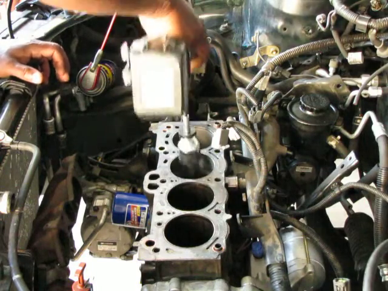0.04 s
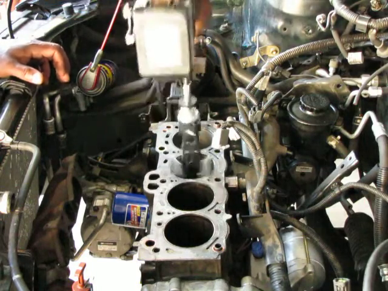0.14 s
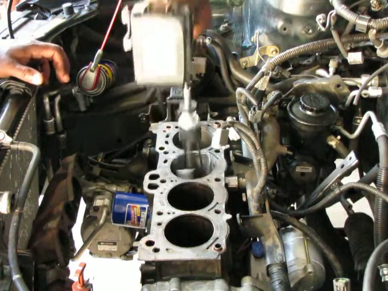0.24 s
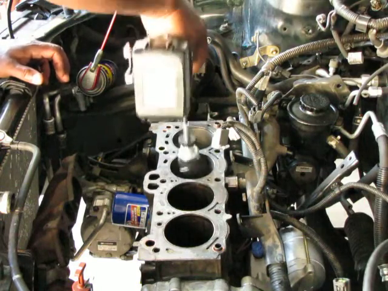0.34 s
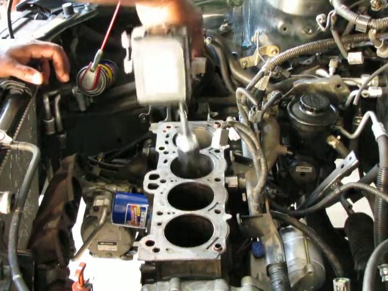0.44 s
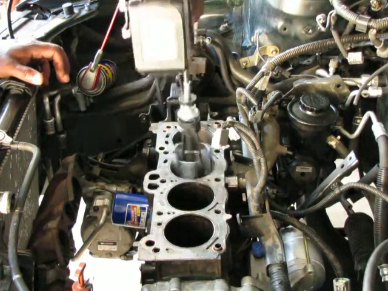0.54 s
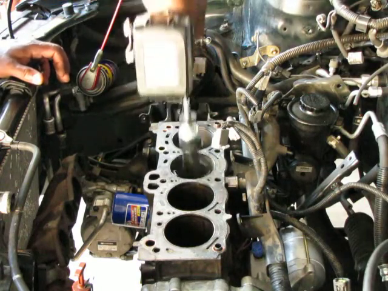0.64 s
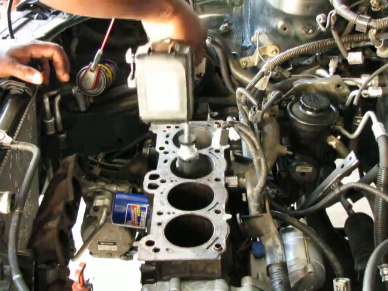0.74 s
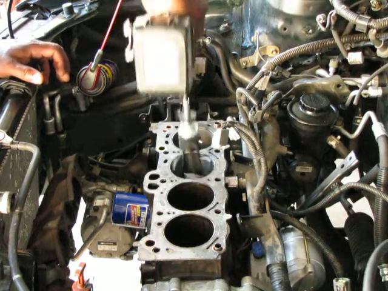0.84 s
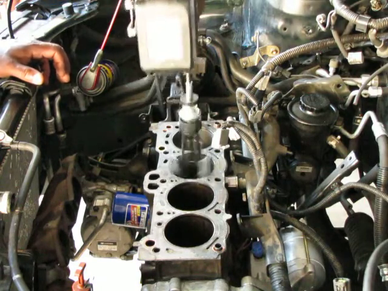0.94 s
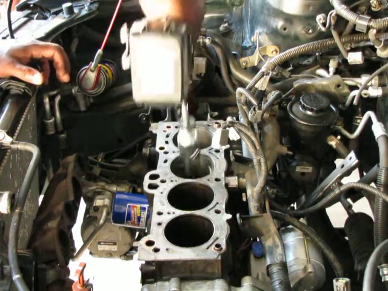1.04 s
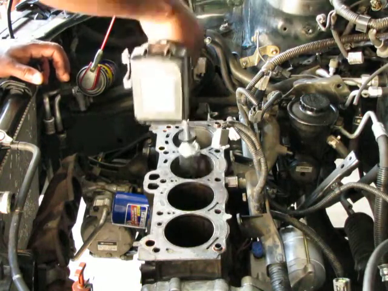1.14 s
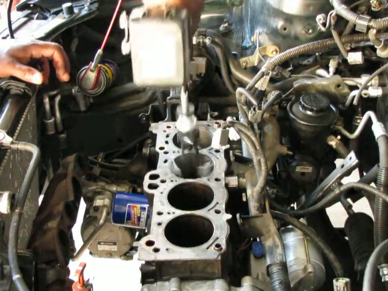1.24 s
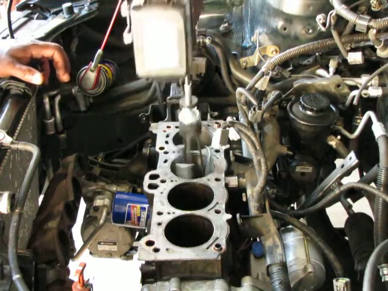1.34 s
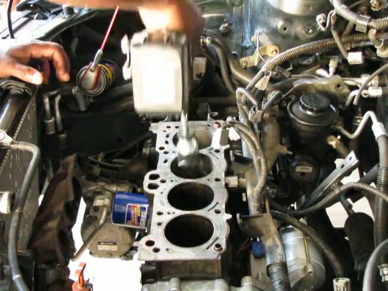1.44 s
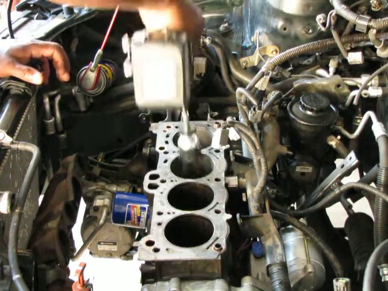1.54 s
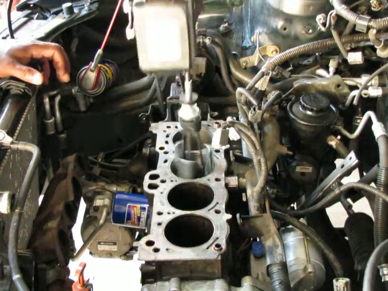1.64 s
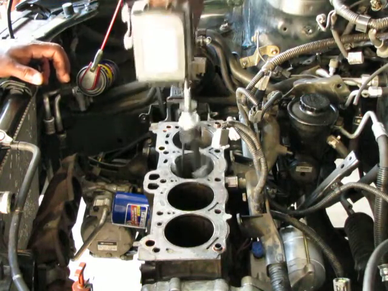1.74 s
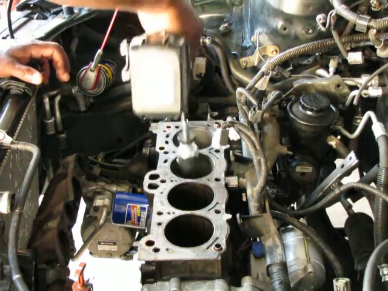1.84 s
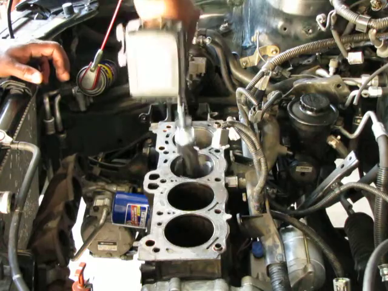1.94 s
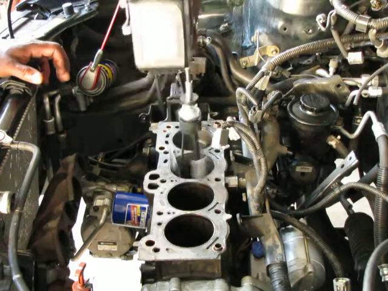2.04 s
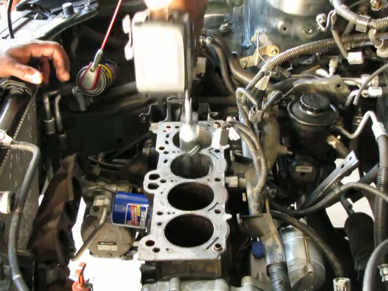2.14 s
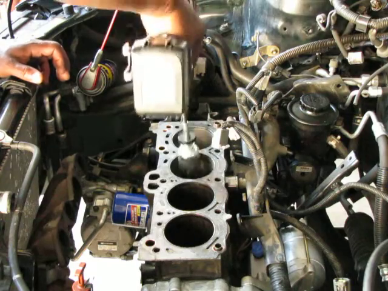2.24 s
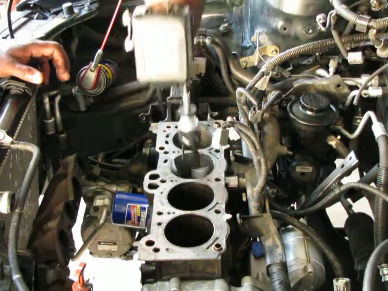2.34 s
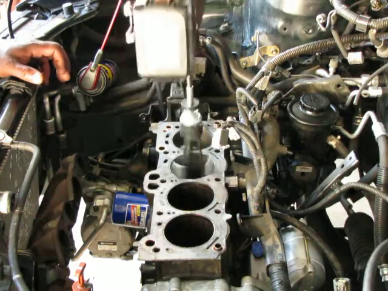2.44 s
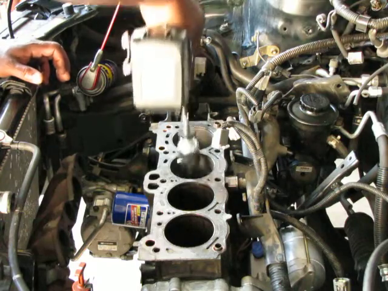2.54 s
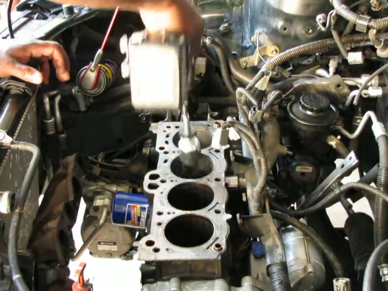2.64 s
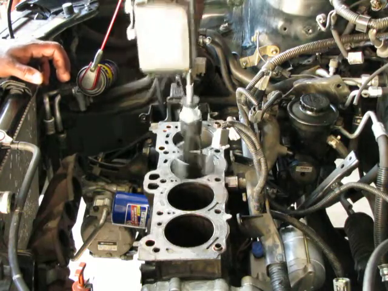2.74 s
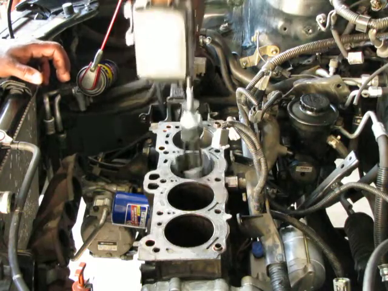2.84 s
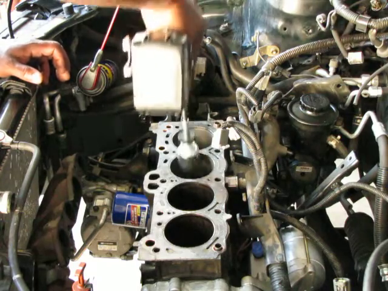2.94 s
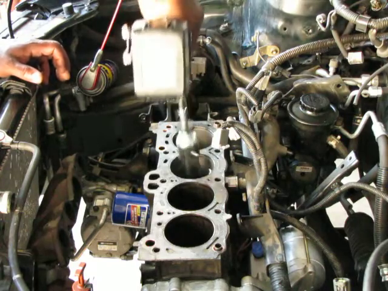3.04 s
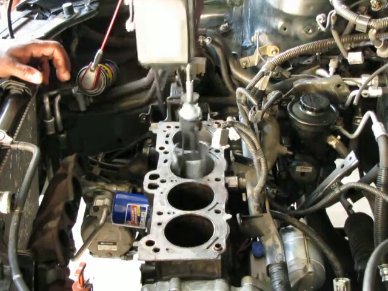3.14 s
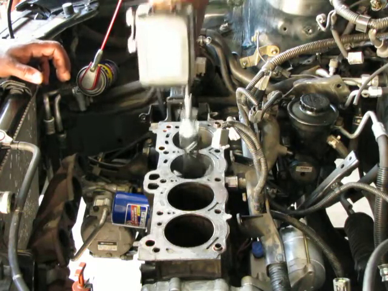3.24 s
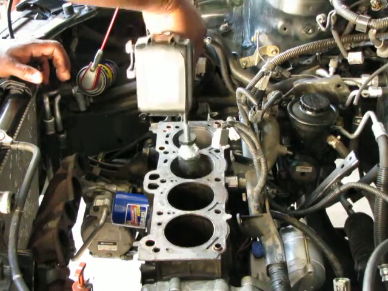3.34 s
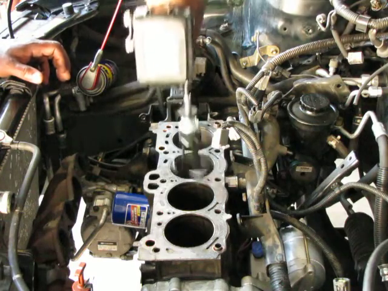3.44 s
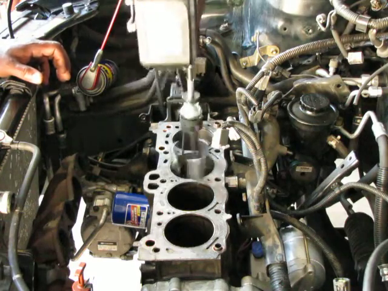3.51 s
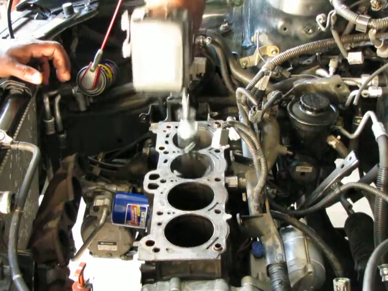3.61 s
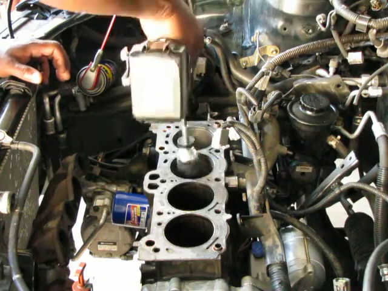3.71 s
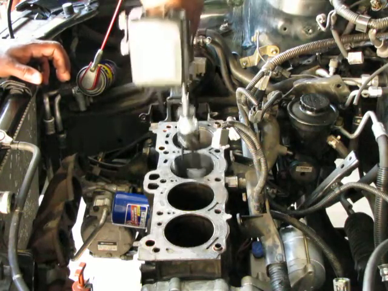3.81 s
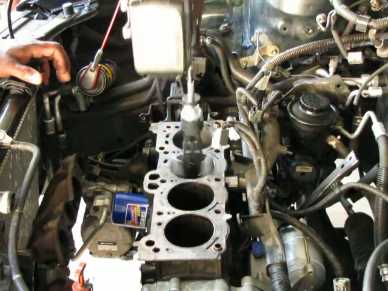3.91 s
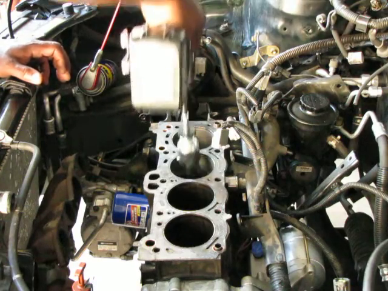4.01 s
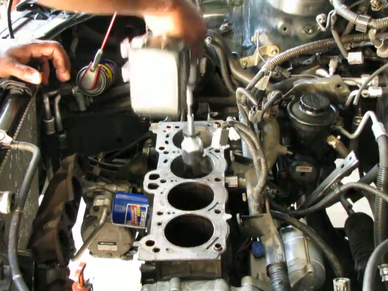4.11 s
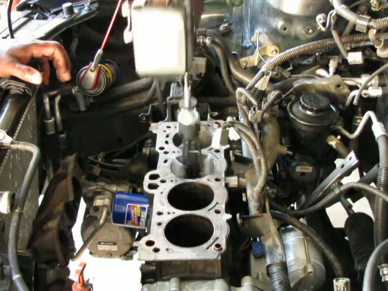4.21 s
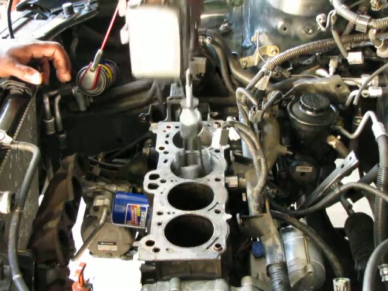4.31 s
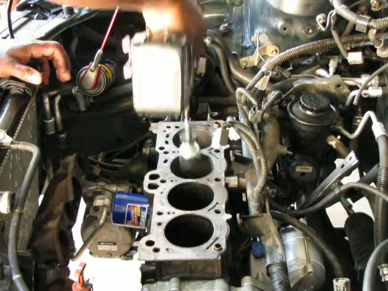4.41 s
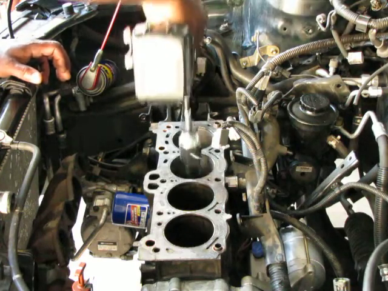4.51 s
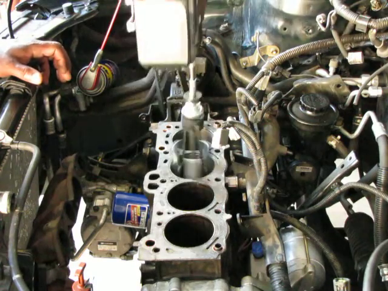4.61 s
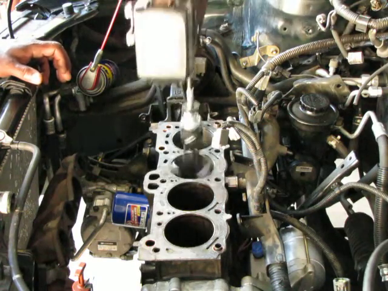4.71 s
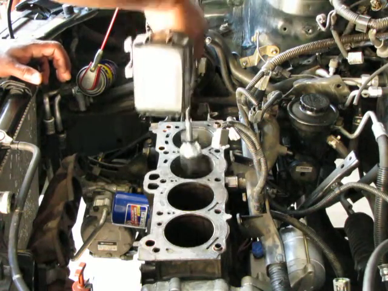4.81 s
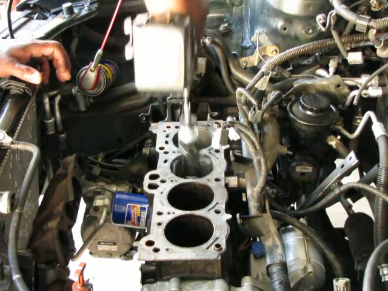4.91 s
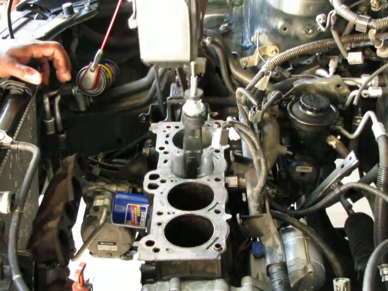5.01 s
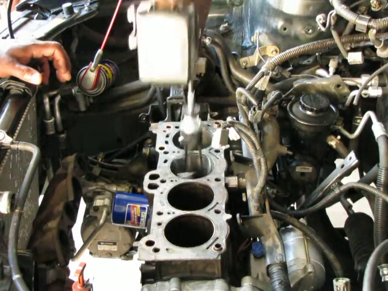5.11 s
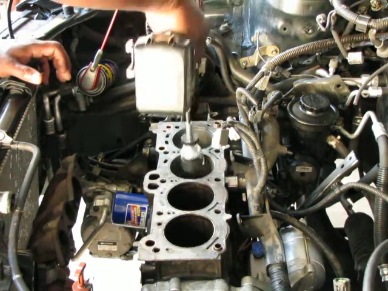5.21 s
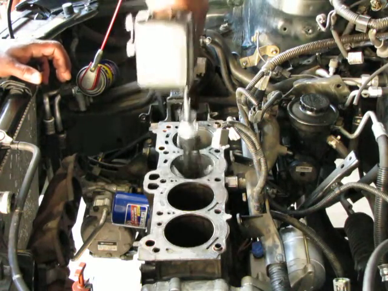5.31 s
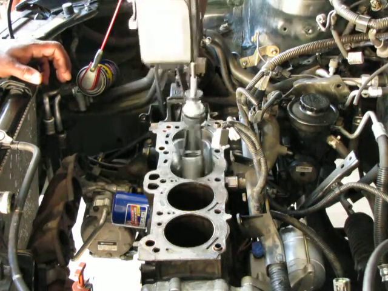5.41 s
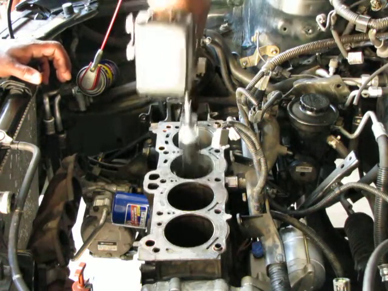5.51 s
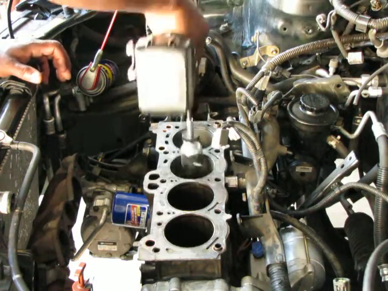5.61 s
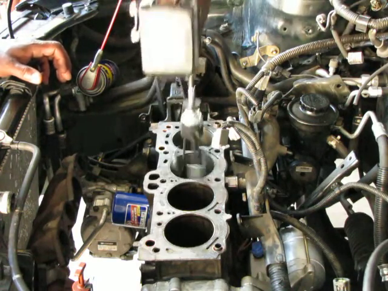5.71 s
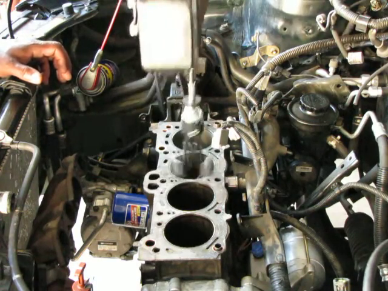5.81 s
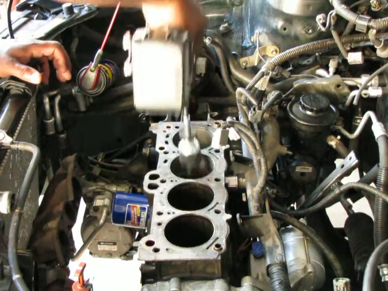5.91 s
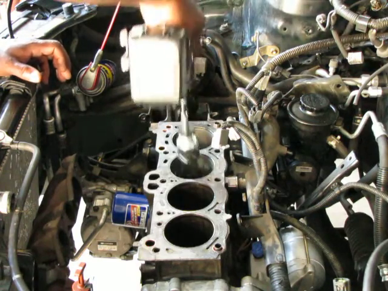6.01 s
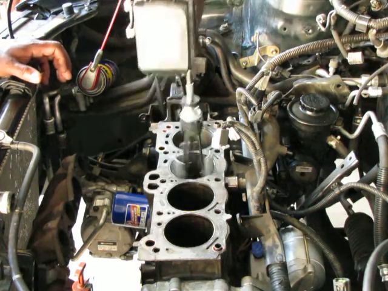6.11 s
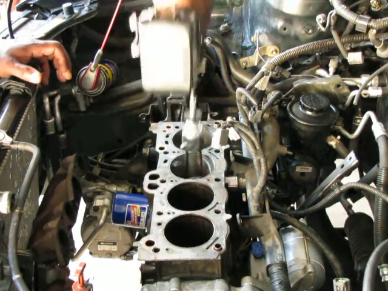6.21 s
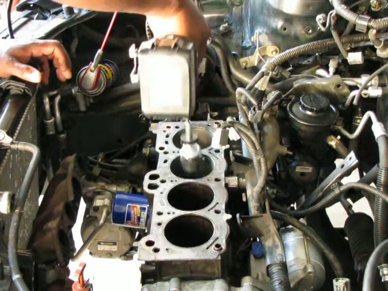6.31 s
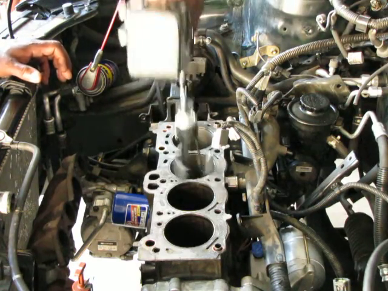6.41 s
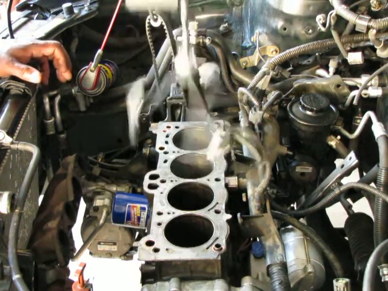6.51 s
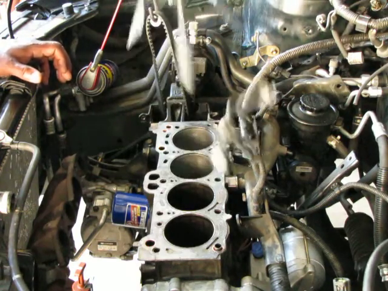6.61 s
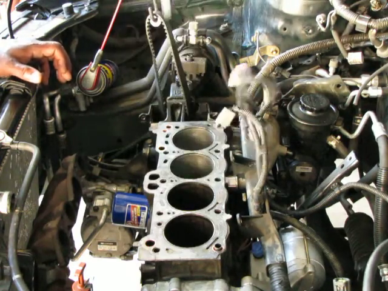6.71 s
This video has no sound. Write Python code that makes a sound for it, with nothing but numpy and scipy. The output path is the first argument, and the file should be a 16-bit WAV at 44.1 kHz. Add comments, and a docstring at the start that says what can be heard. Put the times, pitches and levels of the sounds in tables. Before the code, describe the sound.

Close, harsh drill whine and gritty abrasive scraping pulse nearly three times a second in an engine bore, clacking metallically, then rattling out and stopping.

```python
"""In a garage, an electric drill spins a honing tool in a cylinder of an engine block, pumped nearly three
strokes a second. The motor whines in shaft-locked tones; abrasive stones rasp as grit excites the bore.
The stones bite and thud at the foot of each stroke, and hard clacks ring the steel tool and the block.
The recorder's gain control ducks at every hard clack and swells back. At last the tool rattles out of
the bore and the drill falls quiet."""
import sys
import numpy as np
from scipy import signal
from scipy.fft import rfft, irfft, next_fast_len
from scipy.io import wavfile
from scipy.ndimage import uniform_filter1d

SR = 44100
rng = np.random.default_rng(int(sys.argv[2]) if len(sys.argv) > 2 else 0)


def master_out(mix):
    """Clip the mix to full scale and print it as 16-bit PCM to the path in sys.argv[1]."""
    frames = np.transpose(np.atleast_2d(mix))
    ceiling = np.clip(frames, -1, 1)
    pcm = np.round(ceiling * 32767).astype(np.int16)
    wavfile.write(sys.argv[1], SR, pcm)


N = 297675


def from_db(db):
    """Logarithmic level: decibels to amplitude gain."""
    return 10 ** (np.asarray(db) / 20)


def rms_one(x):
    """Power normalization: scale to a root mean square of one."""
    return x / np.sqrt(np.mean(x ** 2) + 1e-20)


def in_time(rows):
    """Linear interpolation: each column of a curve, sample by sample."""
    seconds, *columns = np.transpose(rows)
    time_s = np.arange(N) / SR
    return [np.interp(time_s, seconds, column) for column in columns]


def at_hz(points, hz):
    """Logarithmic frequency: interpolate a table evenly per octave."""
    table_hz, value = np.transpose(points)
    return np.interp(np.log(np.maximum(hz, 1)), np.log(table_hz), value)


def drift(corner_hz):
    """Low-passed noise: a smooth random wander of spread 1."""
    step = 40   # samples between the points of the slow noise
    r = np.exp(-2 * np.pi * corner_hz * step / SR)
    noise = rng.standard_normal(N // step + 2002)
    slow = signal.lfilter([1], [1, -2 * r, r * r], noise)[2000:]   # the filter has settled
    return np.interp(np.arange(N) / step, np.arange(len(slow)), rms_one(slow))


def fall(start_s, db_per_s):
    """Exponential decay: a level in dB that holds at 0, then sinks steadily."""
    return -db_per_s * np.maximum(np.arange(N) / SR - start_s, 0)


def swell(middle_s, half_s):
    """Gaussian envelope: a smooth bump of height 1, down to 1/e at half_s from its middle."""
    distance = (np.arange(N) / SR - middle_s) / half_s
    return np.exp(-np.minimum(distance ** 2, 50))


# correlation of the two ears: frequency_hz, likeness (0 unrelated, 1 identical)
EAR_LIKENESS = [(30, 0.48), (130, 0.9), (300, 0.99), (640, 1), (1400, 0.9), (3000, 0.81), (6000, 0.55),
                (14000, 0.1)]


def coloured(force, spectrum, resonances=()):
    """Spectral shaping and interaural coherence: filter two unrelated forces into stereo of rms 1."""
    size = next_fast_len(N)
    hz = np.arange(size // 2 + 1) * SR / size
    db = at_hz(spectrum, hz)
    for mode_hz, width_hz, lift_db in resonances:
        db = db + lift_db / (1 + (2 * (hz - mode_hz) / width_hz) ** 2)
    mid, side = rfft(force, size) * from_db(db)
    alike = np.clip(at_hz(EAR_LIKENESS, hz), -1, 1)
    ears = np.sqrt(1 + alike) * mid + np.sqrt(1 - alike) * side * [[1], [-1]]
    return rms_one(irfft(ears, size)[:, :N])


def ring(force, modes):
    """Modal resonance: parallel resonators of alternating sign; white noise keeps its power."""
    out, power = 0, 0
    for k, (hz, width_hz, db) in enumerate(modes):
        r = np.exp(-np.pi * width_hz / SR)
        top = (1 - r * r) / 2
        poles = [1, -2 * r * np.cos(2 * np.pi * hz / SR), r * r]
        response = signal.lfilter([top, 0, -top], poles, force + 1e-18)
        out = out + (-1) ** k * from_db(db) * response
        power += top * from_db(db) ** 2
    return out / np.sqrt(power)


def partials(angle, orders, main, main_share, scatter, apart):
    """Multipath interference: reflections off the moving drill add to or cancel each shaft-locked tone."""
    def wander():
        return drift(10.5) + 1j * drift(19)

    out = np.zeros((2, N))
    for multiple, db in orders:
        directional = min(multiple / main, 1)   # long waves reach both ears alike
        reflected = main_share if multiple == main else 1   # the main tone comes more directly
        common = 1 + reflected * scatter * wander()
        path = common + apart * directional * wander() * np.array([[1], [-1]])
        if multiple == main:   # share the common strength between the ears
            both = np.sqrt(np.mean(np.abs(path) ** 2, axis=0))
            path = path / both * np.abs(path.mean(axis=0))
        tone = path * np.exp(1j * (multiple * angle + rng.uniform(0, 2 * np.pi)))
        out += from_db(db) * rms_one(tone.real)
    return out


# shaft speed of the motor: time_s, rotation_hz
MOTOR_SPEED = [(0.03, 309.0), (0.06, 316.1), (0.16, 321.8), (0.32, 314.3), (0.52, 328.0), (0.66, 315.1),
               (0.76, 317.0), (0.85, 324.2), (1.48, 321.1), (1.52, 318.7), (1.66, 322.1), (1.74, 317.9),
               (1.86, 319.3), (1.99, 332.7), (2.23, 320.5), (2.34, 327.0), (2.61, 318.2), (2.73, 324.0),
               (2.94, 319.7), (3.13, 324.9), (3.28, 314.7), (3.43, 322.1), (3.75, 320.3), (3.81, 326.4),
               (3.86, 326.2), (4.1, 317.0), (4.33, 323.0), (4.5, 316.3), (4.53, 322.7), (4.66, 325.2),
               (4.77, 309.4), (4.91, 324.1), (5.01, 326.9), (5.04, 326.2), (5.15, 308.5), (5.26, 321.0),
               (5.31, 324.4), (5.42, 322.7), (5.51, 309.1), (5.59, 314.8), (5.79, 319.5), (5.9, 314.5),
               (6.08, 323.8), (6.15, 321.7), (6.22, 309.9), (6.26, 309.8), (6.48, 323.9), (6.55, 318.0)]
# hum of motor and gears: multiple of the shaft speed, level_db (relative to the tenth order)
HUM_TONES = [(.437, -30), (1, -23.5), (2, -25), (2.2, -25), (4, -22.5), (6, -15.5), (8, -22), (8.4, -10.5),
             (10, 0), (10.4, -11.5), (11, -11.5), (12, -19.5), (14, -9.5)]
# shrill cluster with sidebands one revolution apart: multiple of the shaft speed, relative level_db
SHRILL_TONES = [(19, -11), (20, 0.5), (21, -5.5), (22, -8.5), (23, -28), (29, -30), (30, -6.5), (31, -18),
                (40, -15)]
# slow swell of the two whines: time_s, hum_change_db, shrill_change_db
WHINE_SWELL = [(.08, -2, -1), (.27, 1, -1.5), (.55, -3, -4), (1.2, 0, 1), (1.85, -2.5, -2.5),
               (2.15, 0.5, -2), (2.5, 0, .5), (3.2, -1.5, -2.5), (3.6, -1, -2), (3.95, 1.5, 1),
               (4.15, -0.5, 0.5), (4.6, 2.5, 2.5), (5.02, 4, 2.5), (5.35, 2, 3.5), (5.7, 1, -0.5),
               (5.93, 2, 3), (6.27, 0.5, 3), (6.45, -2.5, -1.5)]
# foot of each stroke: start_s (middle of the bump), bite_db (extra rasp of the stones), thud_db (relative)
STROKE_FEET = [(.005, 4, -48), (.395, 7, -43.5), (.755, 4, -50), (1.135, 5, -48), (1.5, 4.5, -47),
               (1.885, 1, -45), (2.24, 0, -42), (2.6, 4.5, -45), (3.0, 2.5, -40), (3.372, 1, -43),
               (3.73, 5, -45), (4.065, 4.5, -41), (4.46, 5.5, -37), (4.85, 0.5, -49), (5.13, 0, -60),
               (5.585, 2.5, -53), (5.96, 3.5, -48), (6.305, 5.5, -35.5)]
USUAL_SPEED_HZ = 321
WHINE_DIP_DB, WHINE_DIP_S = 1, 0.071   # the whine falters at each foot: depth, half-length
FLUTTER_DB_PER_SAG_HZ = 0.34   # when the motor labours, the shrill whine breaks up
TRIGGER_OFF_S, WHINE_FALL_DB_PER_S = 6.53, 200


def drill(jitter_rad=0.014, flutter_db=1.34, waver_db=1.0, hum_db=-29.0, shrill_db=-24.5):
    """Harmonic orders: uneven rotation roughens high multiples most; they fade as the trigger is let go."""
    speed, = in_time(MOTOR_SPEED)
    hum_change, shrill_change = in_time(WHINE_SWELL)
    angle = 2 * np.pi * np.cumsum(speed) / SR + jitter_rad * drift(45)
    dip_db = WHINE_DIP_DB * sum(swell(s, WHINE_DIP_S) for s, _, _ in STROKE_FEET)
    sag_hz = np.maximum(USUAL_SPEED_HZ - speed, 0)
    labour_db = FLUTTER_DB_PER_SAG_HZ * sag_hz * (np.minimum(drift(40), 1.5) - .5)

    hum_level = hum_db + hum_change - dip_db + waver_db * drift(15)
    hum = from_db(hum_level) * partials(
        angle, HUM_TONES, main=10, main_share=0.49, scatter=0.4, apart=0.36)
    shrill_level = shrill_db + shrill_change - dip_db + labour_db
    shrill = from_db(shrill_level) * partials(
        angle, SHRILL_TONES, main=20, main_share=.75, scatter=0.29, apart=0.83)

    hum_balance = from_db(np.array([[-.5], [.5]]))   # slightly stronger on the right
    fade_db = fall(TRIGGER_OFF_S, WHINE_FALL_DB_PER_S) + flutter_db * drift(32)
    return (hum * hum_balance + shrill) * from_db(fade_db)


def grit(per_s, size_db, hiss):
    """Impulsive excitation: grains of uneven size break loose over a smooth friction hiss."""
    sizes = from_db(size_db * np.minimum(rng.exponential(1, N), 2.5))
    breaks = rng.random(N) < per_s / SR
    grains = breaks * sizes * rng.choice([-1, 1], (2, N))
    return rms_one(grains) + hiss * rng.standard_normal((2, N))


# resonances of the stones and their sprung arms: pitch_hz, width_hz, relative level_db
SQUEAK_MODES = [(2640, 40, -19), (3700, 83, -10), (4340, 26, -14), (5250, 57, -14.5), (5550, 48, -13.5),
                (8300, 160, -17), (13200, 120, -31)]


def squeaks(patchy_db=7.5):
    """Stick-slip resonance: the stones catch now and then and sing briefly at a mode."""
    out = 0
    for mode in SQUEAK_MODES:
        noise = rng.standard_normal((2, N))
        catching = from_db(patchy_db * np.minimum(drift(30), 2))
        out = out + from_db(mode[2]) * rms_one(ring(noise * catching, [mode]))
    return out


# spectrum of the rasp: frequency_hz, relative density_db (per Hz)
RASP_COLOUR = [(900, -24.5), (1700, -13.5), (2700, -1), (3700, -1.5), (5000, 1.5), (7000, -2), (9000, -2.5),
               (10800, -8.5), (12600, -8), (14000, -12), (15800, -18.5)]
# spectrum of the low grinding: frequency_hz, relative density_db (per Hz)
GRIND_COLOUR = [(120, -13), (230, -15.5), (400, -20), (520, -16), (800, -4), (1300, -1), (2000, 1),
                (2800, 1), (4500, -32), (8000, -37)]
# resonances of block and bore: pitch_hz, width_hz, lift_db
BORE_MODES = [(528, 62, 8.5), (818, 27, 5), (1172, 48, 4.5), (1325, 23, 4), (1436, 81, 4), (1694, 20, 7),
              (2445, 61, 0.5), (2740, 27, -6), (3260, 58, 4), (4320, 150, 1.5)]
# how hard the hand bears on the tool: time_s, level_change_db
HAND_PRESSURE = [(0, 0), (.6, -1.5), (1.3, -1), (1.9, -1.5), (2.6, 0), (3.3, -1), (4.0, 0), (4.6, 2.5),
                 (5.1, 3), (5.6, 1.5), (6.1, 3), (6.5, 2.5)]
RASP_DB_PER_SAG_HZ = 0.0849   # the friction that slows the motor also makes the stones louder
BITE_S, GRIND_BITE_SHARE = 0.023, 0.66   # half-length; how much of the bite the grinding follows
# the tool is drawn out: the stones spring open and scuff over the rim, then run free
EXIT_S, EXIT_HALF_S, EXIT_RASP_DB, EXIT_GRIND_DB = 6.55, 0.029, 4.5, 9.5
CLEAR_S, RASP_FALL_DB_PER_S, GRIND_FALL_DB_PER_S = 6.57, 188, 35


def stones(rasp_db=-22.0, grind_db=-36.5, judder_db=0.72):
    """Friction-excited resonance: grit drives the bore, harder under load, at stroke feet and on the rim."""
    speed, = in_time(MOTOR_SPEED)
    pressure, = in_time(HAND_PRESSURE)
    load = pressure + RASP_DB_PER_SAG_HZ * (USUAL_SPEED_HZ - speed)
    bite = sum(db * swell(s, BITE_S) for s, db, _ in STROKE_FEET)
    rim = swell(EXIT_S, EXIT_HALF_S)
    judder = from_db(judder_db * drift(30))

    rasp_level = rasp_db + load + bite + EXIT_RASP_DB * rim
    rasp_level = rasp_level + fall(CLEAR_S, RASP_FALL_DB_PER_S)
    scrape = coloured(grit(per_s=7000, size_db=1.0, hiss=0.91), RASP_COLOUR, BORE_MODES)
    rasp = from_db(rasp_level) * (scrape + from_db(-4.0) * squeaks())

    grind_level = grind_db + load + GRIND_BITE_SHARE * bite + EXIT_GRIND_DB * rim
    grind_level = grind_level + fall(CLEAR_S, GRIND_FALL_DB_PER_S)
    rumble = coloured(grit(per_s=3000, size_db=2.5, hiss=1.44), GRIND_COLOUR, BORE_MODES)
    grind = from_db(grind_level) * rumble

    grind_balance = from_db(np.array([[-1.3], [1.3]]))   # stronger on the right
    return judder * (rasp + grind * grind_balance)


# tool striking the bore: start_s, relative level_db, relative knock_db (dull part), chatter_s (length)
TOOL_BLOWS = [(.002, -19, -15, 0.026), (.022, -5.5, -15, 0.008), (.37, -2, -10.5, 0.0025),
              (.392, -21, 0, 0.015), (.414, -2.5, -27, 0.0077), (.444, 10.5, -21, 0.0025),
              (0.46, -1.5, -27, 0.0027), (0.76, -11, -7, .0036), (0.786, 4, -20, 0.0033),
              (0.793, -10, -11, .0025), (1.145, -13, -1, .002), (1.885, -7.5, -9, 0.006),
              (2.249, -3.5, -16, 0.0073), (2.612, -2, -14, 0.0054), (4.078, -3.5, -14, 0.0035),
              (4.444, -9, -6, 0.0078), (4.483, 6, -16.5, 0.0093), (4.85, -8.5, -13, .0068),
              (5.604, 1.5, -16, 0.0033), (5.97, 1.5, -19, 0.0053), (6.332, 9, -19, .005),
              (6.479, 1.5, -8, 0.0068), (6.502, -1, 1.5, 0.0016), (6.508, -10, 2, 0.0021),
              (6.512, 0, -10.5, 0.0014), (6.536, -7, 0, 0.0031), (6.606, -20, 16, 0.0026),
              (6.696, -21, -7, 0.0024), (6.738, -14.5, -8.5, 0.0024)]
# ring of the steel tool: pitch_hz, width_hz, relative level_db
STEEL_MODES = [(3560, 140, -5), (3770, 44, 3.5), (4810, 570, 5), (5430, 69, 11.5), (6320, 160, 10),
               (7260, 130, 8), (8450, 690, 3), (9400, 330, 5), (9900, 1800, -4), (13500, 150, 0),
               (13200, 840, -16)]
# dull knock of the block: pitch_hz, width_hz, relative level_db
KNOCK_MODES = [(595, 280, -8), (1115, 120, -3.5), (1387, 79, 4), (1710, 300, 0), (2560, 135, 6.5),
               (2990, 57, 9), (4200, 1100, -1)]


def clacks(steel_db=-3.5, knock_db=-5.0, tail_db=-11.5, tail_s=0.021, rise_share=0.14):
    """Impact excitation: a short chatter, scattered further by the engine bay, rings tool and block."""
    t = np.arange(SR // 6) / SR
    out = np.zeros((2, N + len(t)))
    for start_s, db, dull_db, chatter_s in TOOL_BLOWS:
        rise = 1 - np.exp(-t / (rise_share * chatter_s))
        tail = from_db(tail_db) * np.exp(-t / tail_s)
        shape = rise * (np.exp(-(t / chatter_s) ** 2) + tail)
        shared, left, right = rng.standard_normal((3, len(t)))
        separate = np.array([left, right])
        bright = rms_one(ring(shape * (0.5 * shared + 0.89 * separate), STEEL_MODES))
        dull = rms_one(ring(shape * (1.1 * shared + 0.11 * separate), KNOCK_MODES))
        blow = from_db(steel_db) * bright + from_db(knock_db + dull_db) * dull
        strength = from_db(db) * np.sqrt(np.mean(shape ** 2))   # a longer chatter carries more energy
        at = max(round(start_s * SR), 0)
        out[:, at:at + len(t)] += strength * blow
    return out[:, :N]


# boom of the block: pitch_hz, width_hz, relative level_db
BLOCK_MODES = [(220, 64, 1), (359, 33, 5), (515, 31, 7), (820, 220, 0.5)]


def thuds(length_s=0.02):
    """Forced vibration: brief chatter at the foot of a stroke shakes the modes of the whole block."""
    push = sum(from_db(db) * swell(s, length_s) for s, _, db in STROKE_FEET)
    no_bass = signal.butter(2, 130, "high", fs=SR, output="sos")   # the block radiates no deep bass
    force = signal.sosfilt(no_bass, rng.standard_normal(N))
    return ring(push * force, BLOCK_MODES)


# garage background: frequency_hz, relative density_db (per Hz)
GARAGE_COLOUR = [(40, -10), (58, 2), (100, 6.5), (140, 0), (165, -18), (188, 11.5), (215, -4), (400, -12),
                 (1500, -2), (5000, -11), (15000, -20)]


def garage(background_db=-52.5):
    """Diffuse ambience: steady noise shaped by the spectrum of the garage."""
    return from_db(background_db) * coloured(rng.standard_normal((2, N)), GARAGE_COLOUR)


LEFT_LAG_S = 3e-5   # the work lies slightly right of the microphones


def scene():
    """Superposition and interaural delay: drill, stones and blows over the garage background."""
    work = drill() + stones() + clacks() + thuds()
    size = next_fast_len(N + 100)
    hz = np.arange(size // 2 + 1) * SR / size
    lag = np.exp(-2j * np.pi * hz * LEFT_LAG_S)
    left = irfft(rfft(work[0], size) * lag, size)[:N]
    return np.array([left, work[1]]) + garage()


THRESHOLD_DB, SQUEEZE = -15.0, 0.76   # level where it starts; share of the excess taken away
DETECT_S, ATTACK_S, RECOVER_S = 0.0053, 0.00071, 0.65   # averaging window; two time constants


def gain_control(x):
    """Dynamic compression: excess level quickly pulls the gain down; the cut in dB dies away slowly."""
    power = uniform_filter1d(np.mean(x ** 2, axis=0), size=int(DETECT_S * SR))
    level_db = 10 * np.log10(np.maximum(power, 1e-12))
    wanted_db = SQUEEZE * np.maximum(level_db - THRESHOLD_DB, 0)
    recovery = np.exp(-np.arange(N) / SR / RECOVER_S)
    held_db = np.maximum.accumulate(wanted_db / recovery) * recovery
    r = np.exp(-1 / (ATTACK_S * SR))
    cut_db = signal.lfilter([1 - r], [1, -r], held_db)
    return x * from_db(-cut_db)


# faint steady noise of the recorder: frequency_hz, relative density_db (per Hz)
FLOOR_COLOUR = [(30, -4), (100, 0), (300, -12), (3000, -22)]
CUTOFF_HZ = 15800


def record(dry, floor_db=-67):
    """Saturation and band limiting: gain control, faint noise, rounded peaks and a steep treble cut."""
    noise = from_db(floor_db) * coloured(rng.standard_normal((2, N)), FLOOR_COLOUR)
    x = gain_control(dry) + noise
    rounded = x / (1 + (x / .9) ** 4) ** .25
    steep = signal.ellip(10, .1, 80, CUTOFF_HZ, fs=SR, output="sos")
    return signal.sosfilt(steep, rounded)


dry = scene()
out = record(dry)
master_out(out)
```